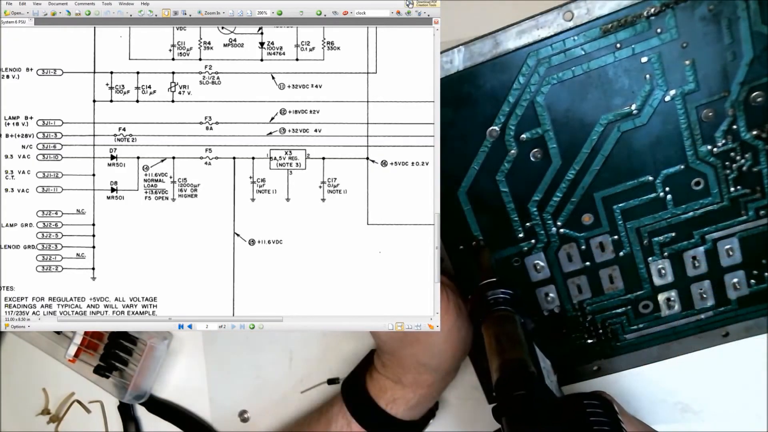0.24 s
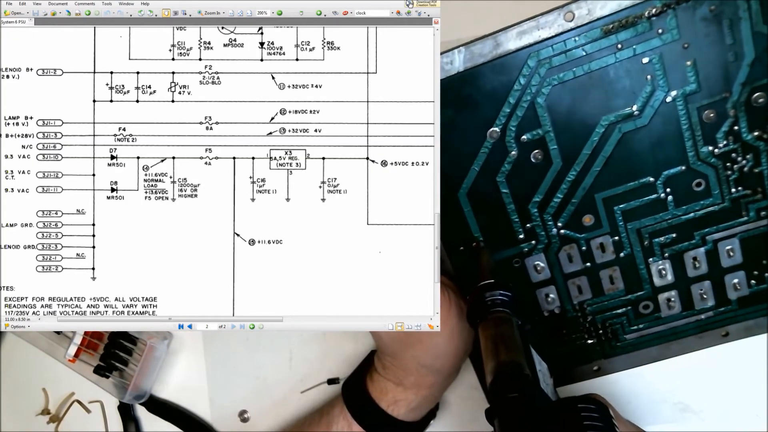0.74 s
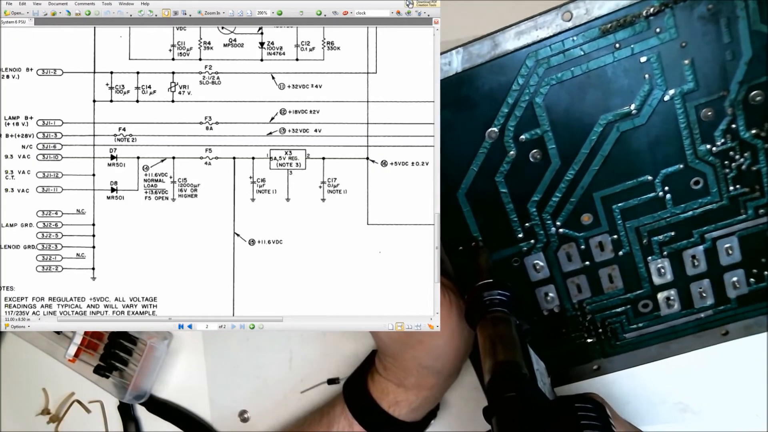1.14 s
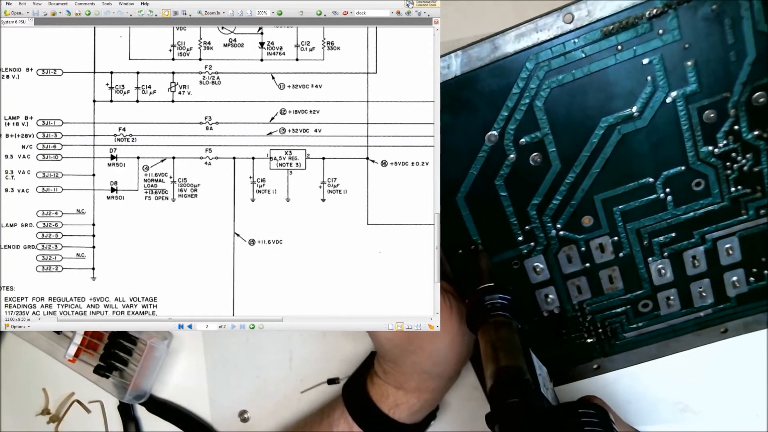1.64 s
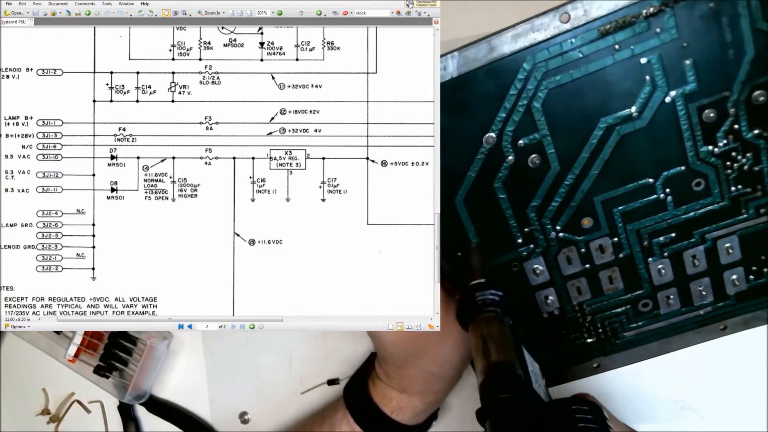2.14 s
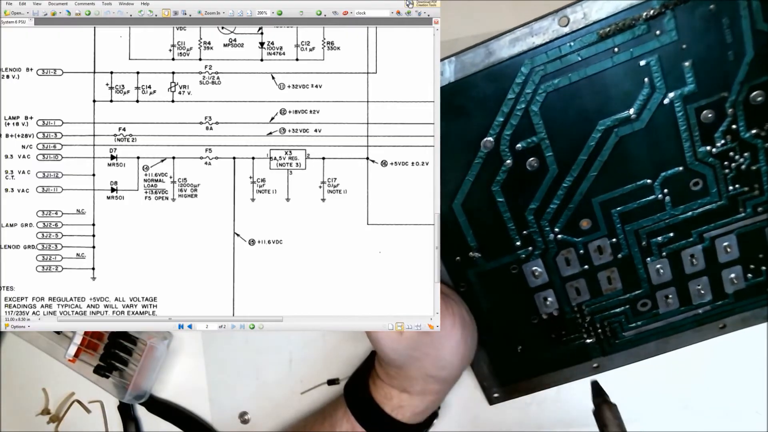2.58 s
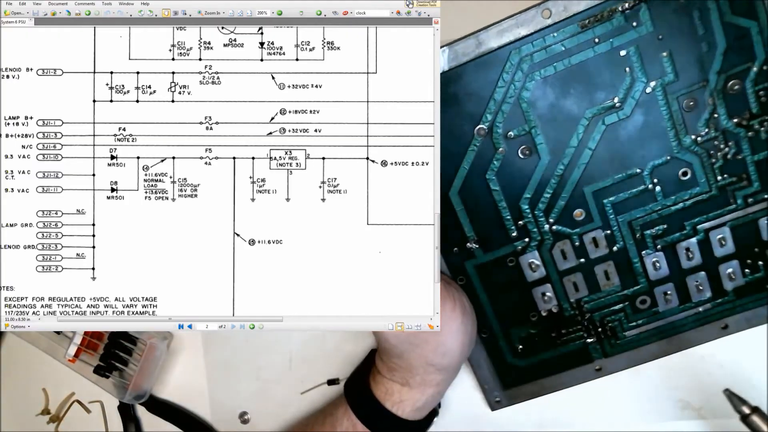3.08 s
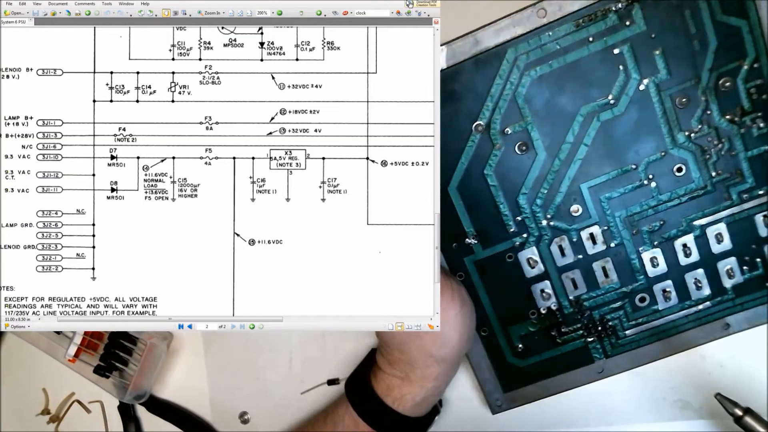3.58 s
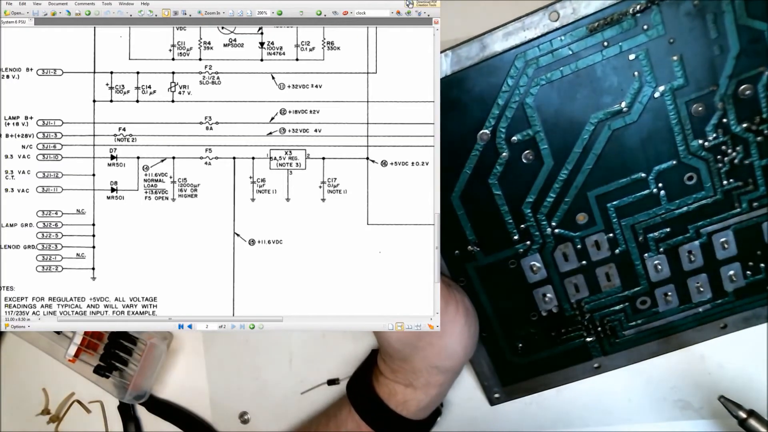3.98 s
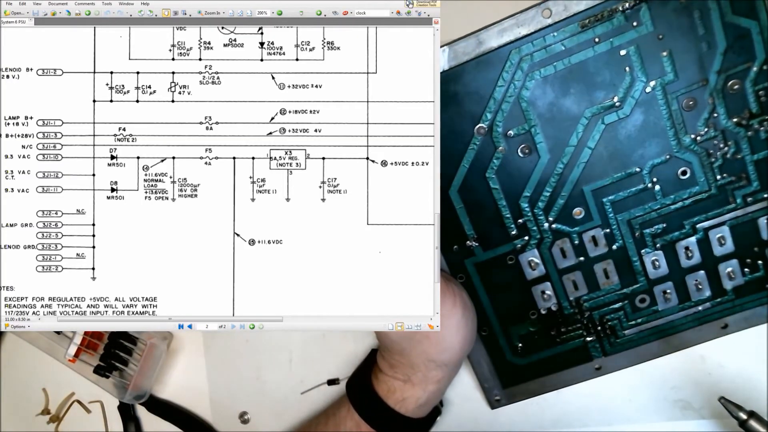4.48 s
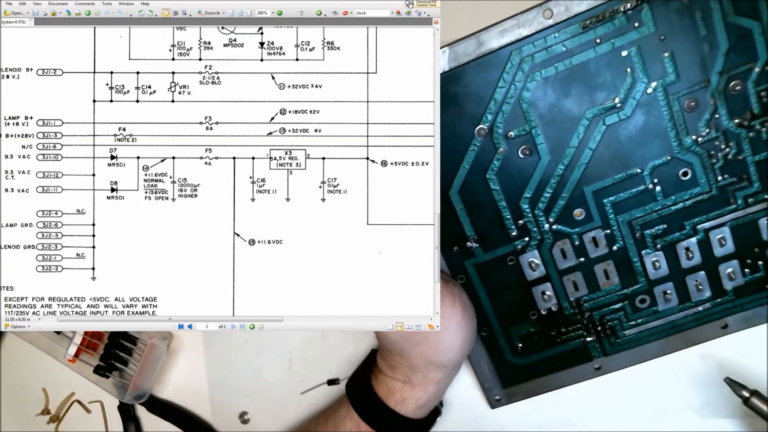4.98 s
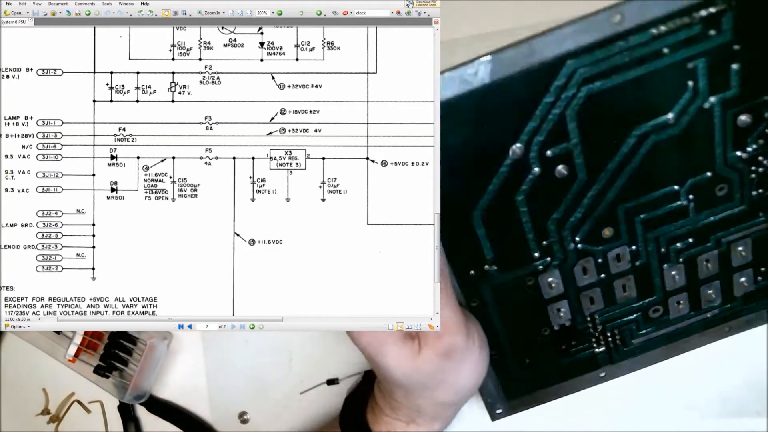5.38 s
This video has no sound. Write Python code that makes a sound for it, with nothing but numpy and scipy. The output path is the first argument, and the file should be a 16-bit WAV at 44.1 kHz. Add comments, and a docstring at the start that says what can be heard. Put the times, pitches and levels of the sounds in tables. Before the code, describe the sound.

Near-silent bench, soft finger creaks, then a hard, fast motor buzz with knocking valves, nozzle air and crackling sparks, cut off after less than a second. Low soft thumps and a quick clattering metal clack follow. Later the pump blips twice in quick succession with trigger clicks, puffs out leaking air, and leaves rustling and a faint final thump. A single close microphone picks up a slight room echo.

```python
"""A quiet bench: room hiss, mains hum, a fan line, a slow sway (sines and shaped noise) and a pulsing whine.
A faint trigger click, finger creaks and rustles (struck ringing, shaped noise) lead to a desoldering gun's run:
its diaphragm pump hums in shaft orders, knocks once a turn, rattles, spits and sparks. Dull thumps (low rings)
and a clack into the metal stand (noise bursts that set it ringing) follow, and the pump runs again, stumbling
once, before the last handling. One microphone hears it all."""
import sys
import numpy as np
from scipy import signal
from scipy.fft import rfft, irfft
from scipy.io import wavfile
from scipy.ndimage import uniform_filter1d, map_coordinates

SR = 44100
rng = np.random.default_rng(int(sys.argv[2]) if len(sys.argv) > 2 else 0)


def how_loud(loudness_db):
    """Turn decibels into a plain amplitude multiplier (0 dB gives 1, 20 dB gives 10)."""
    steps = np.asarray(loudness_db, float) / 20
    return 10 ** steps


def materialize(psi):
    """Save the field psi as 16-bit PCM at rate SR to the path in sys.argv[1].

    A 1-D psi becomes a single channel; in a 2-D psi each row is a channel.
    """
    bounded = np.clip(np.atleast_2d(psi).T, -1, 1)
    quanta = np.round(bounded * 32767).astype(np.int16)
    wavfile.write(sys.argv[1], SR, quanta)


N = 247836   # length in samples
T = np.arange(N) / SR   # time of each sample in seconds

# Room hiss colour. Each row: pitch in Hz, relative dB per Hz.
HISS_COLOUR = [(12, -41.5), (25, -29), (45, -29.5), (70, -34.5), (92, -37.5), (184, -40), (527, -46.5),
               (1090, -42.5), (1550, -47), (1740, -45), (4500, -47), (7070, -58.5), (16000, -59.5)]
# How loud the hiss is. Each row: time in seconds, level in dB before a small fixed lift.
HISS_LEVEL = [(0, -82), (.8, -76), (2.6, -76), (4.2, -77), (5.62, -74.5)]
# Slow sway under the microphone. Each row: time in seconds, level in dB.
SWAY_LEVEL = [(0.0, -74.5), (0.47, -54), (1.45, -58), (2.28, -43), (3.21, -56.5), (5.54, -56.5),
              (5.62, -61)]
# Low bench rumble colour. Each row: pitch in Hz, relative dB per Hz.
RUMBLE_COLOUR = [(8, -17), (14, -1.5), (28, -9.5), (55, -18.5), (90, -31), (200, -60)]
# Electronic whine. Each row: multiple of its base pitch, level in dB before a fixed lift.
WHINE_TONES = [(2, -86), (3, -91), (4, -88.5), (5, -90), (7, -96), (9, -90)]
# Trigger clicks. Each row: time in seconds, strength in relative dB, brightness in dB per octave.
TRIGGER_CLICKS = [(.124, -70, 10), (1.3675, -40, 8.5), (4.638, -48, -3), (4.6665, -36.5, 5),
                  (4.809, -33, 1.5)]
# Ringing of the gun body. Each row: pitch in Hz, relative level in dB, time to fall 60 dB in seconds.
GUN_BODY_RINGS = [(2460, -8.5, 0.014), (2860, -7, 0.019), (3670, -1, 0.0065), (4640, 3.5, 0.013),
                  (5470, -4, 0.019), (6190, -5, 0.012), (7250, 1, 0.0031), (9200, -11.5, .004),
                  (12500, -23, .002)]
# Fingers creak on the grip in even slips. Each row: first slip in seconds, length in seconds,
# gap between slips in seconds, strength of the first slip in relative dB.
FINGER_CREAKS = [(0.434, .01, .007, -66), (0.4488, .035, .0102, -62), (0.503, .03, .012, -62),
                 (0.625, .004, .01, -62.5), (0.697, .018, .013, -65)]
# Rustles of sleeve and fingers. Each row: middle in seconds, level in dB, spread of the bell shape in seconds.
SLEEVE_RUSTLES = [(.48, -83, .06), (0.645, -81, 0.037), (2.99, -83, 0.17), (4.557, -77, .02),
                  (5.35, -77, 0.061), (5.58, -70, 0.16)]
# Air leaking back into the gun. Each row: start in seconds, level in dB, fading in dB per second.
AIR_LEAKS = [(2.19, -62, 38), (5.0, -59, 140)]
# Colour shared by rustles and leaks. Each row: pitch in Hz, relative dB per Hz.
RUSTLE_SPECTRUM = [(410, -20), (700, -5), (779, -5), (1110, -12.5), (2090, 1), (2810, -4.5), (4750, -2),
                   (8500, -13), (12000, -35), (15600, -63), (22000, -120)]
# Pulls of the trigger that run the pump. Each row: on in seconds, off in seconds, drive in dB, air in dB,
# time in seconds of one main knock, which sets the crank angle.
PUMP_RUNS = [(1.378, 2.182, -41.5, -52, 1.4618), (4.679, 4.787, -42.5, -56, 4.93),
             (4.822, 4.993, -42.5, -53.5, 4.899)]
# Shaft orders at full speed: one list for the gun at the board, then one for the gun lifted away.
# Each row: multiple of the shaft speed, relative level in dB.
SHAFT_ORDERS = [
    [(1, -3.5), (2, -18), (3, -15), (4, -11), (5, -8.5), (6, -16), (7, -1), (8, -0.5), (9, -12), (10, -9),
     (11, -11), (12, -4), (13, -10.5), (14, -0.5), (15, 1.5), (16, -5), (17, -14), (18, -21)],
    [(1, -5.5), (2, -37), (3, -12), (4, -9), (5, -12), (6, -23), (7, -1), (8, -2), (9, 6.5), (10, -5.5),
     (11, -6), (12, -2), (13, -8), (14, -23), (15, 2.5), (16, 5), (17, -28), (18, -13)],
]
# Valve and rod knocks within one turn. Each row: place as a share of the turn, pitch in Hz,
# time to fall 60 dB in seconds, relative dB at the board, relative dB lifted away.
KNOCKS = [(0.0, 1978, 0.015, 10, -7), (0.0, 1380, 0.0019, 6, 6), (.06, 1323, 0.046, -0.5, -1.5),
          (0.047, 2780, 0.027, 1.5, -4), (0.201, 5340, 0.024, -4.5, -0.5), (0.37, 1840, 0.01, 7.5, 2),
          (0.541, 1339, 0.026, 5, -5), (.6, 2020, 0.022, 4, 3), (.75, 4710, .014, 7.5, 3.5),
          (0.841, 5030, 0.0068, -3, -7), (0.849, 936, 0.046, -5.5, 5.5), (.4, 3650, 0.0042, -3, 4)]
# Housing rattle colour. Each row: pitch in Hz, relative dB per Hz.
RATTLE_COLOUR = [(47, -38.5), (80, -10.5), (269, -21), (509, -4.5), (666, -14), (889, -4.5), (1140, -9),
                 (1310, -7), (1680, -4), (1960, 0.5), (3920, -9.5), (4750, -7.5), (8000, -27.5),
                 (10400, -46.5), (17600, -120)]
# Colour of the air through the nozzle. Each row: pitch in Hz, relative dB per Hz.
AIR_COLOUR = [(2940, -23.5), (5000, 11.5), (5300, -16.5), (7270, -2), (9600, -10.5), (14600, -15.5),
              (16000, -13)]
# The nozzle seals and the motor labours. Each row: middle in seconds, spread of the bell shape in seconds,
# turns per second lost, drive in dB lost (a minus sign means gained).
NOZZLE_SEALS = [(1.772, .05, 0.66, 1), (2.049, 0.048, 1.72, 1), (2.151, 0.0407, 1.4, -1.3),
                (4.86, .03, 1.55, -1)]
# Loud brush sparks. Each row: time in seconds, click height in dB before it is shaped into a spike.
LOUD_SPARKS = [(1.3808, -36.5), (1.5032, -30), (1.5204, -36), (1.546, -30), (1.562, -26), (1.6871, -26.5),
               (1.7013, -33), (1.729, -32), (1.829, -33), (1.845, -29), (1.8615, -31), (1.8707, -27),
               (1.913, -31.5), (1.9276, -33), (1.9701, -40), (1.9949, -34), (2.0381, -26.5), (2.07, -34.5),
               (2.128, -34), (2.1464, -26.5), (4.683, -34), (4.706, -33.5), (4.7305, -37), (4.822, -37),
               (4.8314, -36), (4.8744, -40)]
# Solder spits, with the air swelling or dipping around them. Each row: time in seconds, starting level in dB,
# dying time in seconds, air change in dB.
SOLDER_SPITS = [(1.404, -48, .004, 2), (1.803, -47, .008, -2), (1.812, -37, .004, 10),
                (2.173, -40.5, .002, 6.5), (4.775, -39, 0.0023, 7), (4.983, -40, 0.003, 5)]
# Board and hand meet the bench. Each row: time in seconds, strength in dB, pitch of the upper ring in Hz.
BENCH_THUMPS = [(2.789, -64, 200), (3.286, -54.5, 200), (3.477, -48.5, 109), (3.865, -66, 130),
                (5.598, -53.5, 148)]
# Gun against the metal stand. Each row: time in seconds, strength in relative dB, brightness in dB per octave.
STAND_CLACKS = [(3.367, -51.5, 13), (3.470, -42.5, -4.5), (3.480, -27.5, 1.5), (3.4865, -28, 8.5),
                (3.4995, -29.5, 11), (3.507, -41.5, -5.5), (3.678, -66.5, -12), (5.513, -54.5, -10.5)]
# Ringing of the stand. Each row: pitch in Hz, relative level in dB, time to fall 60 dB in seconds.
STAND_RINGS = [(405, -22.5, 0.0027), (1061, -20, 0.011), (1580, -7.5, 0.015), (1920, -7, 0.019),
               (2070, -28, .3), (2140, -27, .45), (2210, 3.5, 0.008), (2620, -6.5, 0.01), (3380, -6, 0.016),
               (3920, -4.5, 0.012), (4720, -2, 0.003), (5290, -2.5, 0.0083), (6050, -11, 0.0037),
               (7550, -13.5, 0.0041), (8670, -9, 0.0028), (10350, -21, 0.0023), (12500, -17, 0.0012)]

SWAY_HZ, SWAY_WANDER_HZ = 7.6, .5
MAINS_HZ = 58.8
HUM_IDLE_DB, HUM_WARM_DB = -90.5, -72   # before and after the first run
HUM_PUMPING_DB, BUZZ_PUMPING_DB = -72, -78   # in the first run: the hum, and its second multiple
FAN_HZ, FAN_DB = 1097, -93
WHINE_HZ, WHINE_START_S, WHINE_PERIOD_S = 888.9, .091, .1418
WHINE_SHARE = .6   # share of each period that the whine is on
WHINE_FADE_IN_DB, WHINE_FADE_IN_S = 5.5, 0.46   # the whine starts fainter
ROOM_T60_S, ECHO_DB, WALL_CUT_HZ = 0.25, -16.5, 3800
CREAK_BRIGHTNESS, CREAK_FADE_DB_PER_S = -9, 120   # brightness in dB per octave
FULL_SPEED, SPIN_UP_S = 63.6, .04   # turns per second; time constant of the last gain in speed
FIRST_TURN_SHARE = .82   # share of full speed reached almost at once
SLOWING = 150   # turns per second lost in each second of coasting
START_LOSS_DB, BUILD_UP_S, COAST_DB_PER_S = 15, .018, 702   # drive builds up, then falls while coasting
SWELL_S = 0.03   # spread of the air change around a spit
START_SPARKS_S, START_SPARK_DB = .105, -34.5   # until when, and how high, a spark comes once a turn
TREBLE_SPREAD_HZ, TREBLE_SPREAD_DB = 10800, -2.5


def rms_one(x):
    """Scale to an average (rms) level of 1."""
    return x / np.sqrt(np.mean(x ** 2) + 1e-20)


def curve(rows):
    """Join (seconds, value) points into one value per sample."""
    return np.interp(T, *np.transpose(rows))


def drift(rate):
    """Smooth random wandering of spread about 1; a higher rate wanders faster."""
    steps = rng.standard_normal(int(N / SR * rate * 2) + 3)
    return map_coordinates(steps, [T * rate * 2], order=2)


def bump(middle, half):
    """A smooth bell-shaped swell of height 1."""
    return np.exp(-.5 * ((T - middle) / half) ** 2)


def coloured(spectrum):
    """White noise bent to the given spectrum, at rms 1."""
    hz, db = np.transpose(spectrum)
    grid = np.arange(N // 2 + 1) * SR / N + 1
    gain = how_loud(np.interp(np.log(grid), np.log(hz), db))
    return rms_one(irfft(rfft(rng.standard_normal(N)) * gain, N))


def ring(clicks, hz, t60):
    """A resonance: each unit click starts a sine of height about 1 that dies by 60 dB in t60 seconds."""
    keep, angle = how_loud(-60 / (t60 * SR)), 2 * np.pi * hz / SR   # per sample
    return signal.lfilter([0, np.sin(angle)], [1, -2 * keep * np.cos(angle), keep * keep], clicks + 1e-18)


def clicks_at(s, sizes):
    """One-sample clicks at the given times."""
    out = np.zeros(N)
    places = np.minimum(np.round(np.asarray(s) * SR).astype(int), N - 1)
    np.add.at(out, places, sizes)
    return out


def struck(blows, modes, gain_db, spread_db, chatter_s):
    """Each blow is a short chatter of noise that drives every mode with a strength of its own."""
    s, db, bright = np.transpose(blows)
    out = 0
    for hz, level_db, t60 in modes:
        tilt_db = bright * np.log2(hz / 4000)
        strength_db = db + gain_db + level_db + tilt_db + spread_db * rng.standard_normal(len(s))
        decay = np.exp(-1 / (chatter_s * SR))
        chatter = signal.lfilter([1], [1, -decay], clicks_at(s, how_loud(strength_db)) + 1e-18)
        out = out + ring(chatter * rng.standard_normal(N), hz, t60)
    return signal.sosfilt(signal.butter(2, 350, "high", fs=SR, output="sos"), out)


def room_hiss():
    """Steady noise with the room's colour and a slowly changing level."""
    return how_loud(curve(HISS_LEVEL) + 1) * coloured(HISS_COLOUR)


def mains_hum():
    """A sine at the mains pitch, joined by its second multiple while the pump makes its first run."""
    on, off = PUMP_RUNS[0][:2]
    pumping = uniform_filter1d(1. * (T > on) * (T < off), size=2000)   # 0 to 1 with soft edges
    resting_db = np.where(T < (on + off) / 2, HUM_IDLE_DB, HUM_WARM_DB)
    hum_db = resting_db * (1 - pumping) + HUM_PUMPING_DB * pumping
    hum = how_loud(hum_db) * np.sin(2 * np.pi * MAINS_HZ * T)
    buzz = how_loud(BUZZ_PUMPING_DB) * pumping * np.sin(4 * np.pi * MAINS_HZ * T)
    return np.sqrt(2) * (hum + buzz)


def fan_line():
    """A thin fan tone: one sine whose level and phase wander."""
    return how_loud(FAN_DB + 1.0 * drift(5)) * np.sin(2 * np.pi * (FAN_HZ * T + 0.59 * drift(7.9)))


def slow_sway():
    """A wandering very low sine, with a bench rumble that grows as the sway grows."""
    hz, level_db = SWAY_HZ + SWAY_WANDER_HZ * drift(1.5), curve(SWAY_LEVEL)
    sway = np.sqrt(2) * how_loud(level_db) * np.sin(2 * np.pi * (np.cumsum(hz) / SR + 0.305))
    rumble = how_loud(0.85 * level_db - 26.5) * coloured(RUMBLE_COLOUR)
    return sway + rumble


def electronic_whine():
    """Multiples of one pitch, each wavering in level, switched on and off at a steady pace."""
    on = uniform_filter1d(1. * ((T - WHINE_START_S) / WHINE_PERIOD_S % 1 < WHINE_SHARE), size=300)
    fade_in = how_loud(-WHINE_FADE_IN_DB * np.exp(-T / WHINE_FADE_IN_S))
    tones = sum(how_loud(db + 2.5 + 2.0 * drift(23)) * np.sin(2 * np.pi * (m * WHINE_HZ * T + rng.random()))
                for m, db in WHINE_TONES)
    return on * fade_in * tones


def gun_body(blows):
    """Blows set the gun body ringing."""
    return struck(blows, GUN_BODY_RINGS, gain_db=-19.0, spread_db=2.0, chatter_s=0.0023)


def trigger_clicks():
    """The trigger strikes the gun body."""
    return gun_body(TRIGGER_CLICKS)


def room_echo(x):
    """A dense dull tail of fading noise that starts after the first walls."""
    t = np.arange(int(.5 * SR)) / SR
    dull = np.exp(-2 * np.pi * WALL_CUT_HZ / SR)
    tail = signal.lfilter([1], [1, -dull], rng.standard_normal(len(t)))
    tail = tail * how_loud(-60 * t / ROOM_T60_S) * (t > .004)
    return how_loud(ECHO_DB) * signal.fftconvolve(x, tail / np.sqrt(np.sum(tail ** 2)))[:N]


def finger_creaks():
    """Fingers stick and slip on the grip: even small blows on the gun body, each nominally weaker."""
    slips = [(s, db - CREAK_FADE_DB_PER_S * (s - first), CREAK_BRIGHTNESS)
             for first, length, gap, db in FINGER_CREAKS for s in np.arange(first, first + length, gap)]
    return gun_body(slips)


def rustles_and_leaks():
    """Sleeve rustles swell and fade, air leaks start sharply and fade: grainy coloured noise for both."""
    level = sum(how_loud(db) * bump(s, half) for s, db, half in SLEEVE_RUSTLES)
    leaks = sum((T > s) * how_loud(db - fading * np.maximum(T - s, 0)) for s, db, fading in AIR_LEAKS)
    grain = how_loud(1.1 * drift(52))
    return (level + leaks) * grain * coloured(RUSTLE_SPECTRUM)


def motor(k):
    """Crank angle in turns, drive and air gains and speed of one run: spin-up, labour under a seal, coasting."""
    on, off, drive_db, air_db, knock = PUMP_RUNS[k]
    rising, coasting = np.maximum(T - on, 0), np.maximum(T - off, 0)   # seconds since on and off
    speed = FULL_SPEED * (1 - (1 - FIRST_TURN_SHARE) * np.exp(-rising / SPIN_UP_S) * (T > on))
    speed = speed - SLOWING * coasting
    speed = speed - sum(lost * bump(s, half) for s, half, lost, _ in NOZZLE_SEALS)
    turns = np.cumsum(np.maximum(speed, 1)) / SR
    turns = turns - np.interp(knock, T, turns)   # the main knock falls on a whole turn
    shape_db = -START_LOSS_DB * np.exp(-rising / BUILD_UP_S) - COAST_DB_PER_S * coasting
    labour_db = sum(db * bump(s, half) for s, half, _, db in NOZZLE_SEALS)
    swell_db = sum(db * bump(s, SWELL_S) for s, *_, db in SOLDER_SPITS)
    drive = (T > on) * how_loud(drive_db + shape_db - labour_db)
    air = (T > on) * how_loud(air_db + shape_db + swell_db)
    return turns, drive, air, speed


def shaft_orders(turns, speed, grip):
    """Sines at multiples of the shaft speed; the housing favours pitches, so a slow order takes its pitch's level."""
    multiples, levels = np.transpose(SHAFT_ORDERS[grip])
    orders = 0
    for m in multiples:
        level_db = np.interp(m * speed / FULL_SPEED, multiples, levels) + 3.55 * drift(9)
        phase = m * turns + rng.random() + 0.04 * drift(8)
        orders = orders + how_loud(level_db) * np.sin(2 * np.pi * phase)
    return orders


def valve_knocks(turns, grip):
    """Valves and rod knock at set places in every turn, each knock starting a ring."""
    whole = np.arange(np.ceil(turns[0]), turns[-1] - 1)
    wander = np.interp(whole, turns, drift(5))   # play in the crank shifts a whole turn's knocks
    knocks = 0
    for place, hz, t60, *db in KNOCKS:
        chance = rng.standard_normal((len(whole), 2))
        s = np.interp(whole + place + .012 * wander + .007 * chance[:, 0], turns, T)
        slow_db = 3.1 * np.interp(s, T, drift(4))
        sizes = how_loud(db[grip] + slow_db + 1.0 * chance[:, 1])
        knocks = knocks - ring(clicks_at(s, sizes), hz, t60)
    return knocks


def housing_rattle(turns):
    """Coloured noise that throbs with the turns."""
    throb_db = 4.0 * np.cos(2 * np.pi * (turns - .05)) + 3.0 * np.cos(4 * np.pi * (turns - .07))
    return how_loud(-6.5) * how_loud(throb_db) * coloured(RATTLE_COLOUR)


def nozzle_air(turns):
    """Air through the nozzle: coloured noise in uneven puffs, slightly stronger once a turn."""
    uneven = how_loud(-3 + 2.4 * drift(14) + 3.6 * drift(45))
    return uneven * (1 + 0.14 * np.cos(2 * np.pi * (turns - .05))) * coloured(AIR_COLOUR)


def pump_run(k):
    """One pull of the trigger: the motor drives orders, knocks and rattle, and the pump moves air."""
    turns, drive, air, speed = motor(k)
    grip = min(k, 1)   # 0 at the board, 1 lifted away
    orders = how_loud(-11.5) * shaft_orders(turns, speed, grip)
    knocks = how_loud(-4.0) * valve_knocks(turns, grip)
    return drive * (orders + knocks + housing_rattle(turns)) + air * nozzle_air(turns)


def brush_sparks():
    """Brush sparks reach the microphone wire as one-sided spikes; many small ones fall between the large."""
    s, db = np.transpose(LOUD_SPARKS)
    turns, on = motor(0)[0], PUMP_RUNS[0][0]
    # One spark a turn while the motor first pulls against the solder.
    first, last = np.interp([on + .02, on + START_SPARKS_S], T, turns)
    starting_s = np.interp(np.arange(np.ceil(first), last), turns, T)
    starting = clicks_at(starting_s, how_loud(START_SPARK_DB))
    drive = sum(motor(k)[1] for k in range(len(PUMP_RUNS)))
    chosen = rng.random(N) < 90 / SR   # about 90 a second
    small = chosen * drive * how_loud(-1.0 + 2.26 * np.minimum(rng.exponential(1, N), 3))
    spikes = clicks_at(s, how_loud(db)) + starting + small
    sharp = signal.lfilter([1.2, 1.2], [1, -.3], spikes)
    longer = signal.lfilter([.4], [1, -.85], spikes)
    return -sharp - longer


def solder_slurps():
    """Solder spits through the nozzle: short bright bursts of noise."""
    shape = sum(how_loud(db) * (T > s) * np.exp(-np.maximum(T - s, 0) / dying) for s, db, dying, _ in SOLDER_SPITS)
    band = signal.butter(2, [5200, 9200], "band", fs=SR, output="sos")
    return shape * rms_one(signal.sosfilt(band, rng.standard_normal(N)))


def bench_thumps():
    """Board and hand meet the bench: a short ring over a longer, stronger one at a quarter of its pitch."""
    return sum(ring(clicks_at([s], how_loud(db)), hz, 0.028) + ring(clicks_at([s], how_loud(db + 7.5)), .25 * hz, 0.15)
               for s, db, hz in BENCH_THUMPS)


def stand_clacks():
    """The gun knocks into its metal stand and sets it ringing."""
    return struck(STAND_CLACKS, STAND_RINGS, gain_db=-24.5, spread_db=2.0, chatter_s=0.0041)


def scene():
    """Everything on the bench, the same in both channels; the stand is farther off and echoes more."""
    background = room_hiss() + mains_hum() + fan_line() + slow_sway() + electronic_whine()
    gun = trigger_clicks() + finger_creaks() + solder_slurps()
    gun = gun + sum(pump_run(k) for k in range(len(PUMP_RUNS)))
    stand = stand_clacks()
    echoes = room_echo(gun + how_loud(7.0) * stand)
    handling = rustles_and_leaks() + bench_thumps()
    return np.tile(gun + stand + echoes + brush_sparks() + handling + background, (2, 1))


def roll_off(x):
    """The treble ends steeply here."""
    return signal.sosfilt(signal.butter(12, 16490, fs=SR, output="sos"), x)


def record(dry):
    """Now and then the treble differs between the channels; the very top is cut."""
    smear = rng.standard_normal(900) / 30   # short noise that scatters the treble in time
    high = signal.butter(4, TREBLE_SPREAD_HZ, "high", fs=SR, output="sos")
    treble = np.convolve(signal.sosfilt(high, dry[0]), smear)[:N]
    now_and_then = drift(5) > .3
    side = how_loud(TREBLE_SPREAD_DB) * now_and_then * treble
    spread = dry + side * [[1], [-1]]   # added to one channel, taken from the other
    top = signal.cheby2(12, 60, 16500, fs=SR, output="sos")
    return roll_off(signal.sosfilt(top, spread))


dry = scene()
out = record(dry)
materialize(out)
```